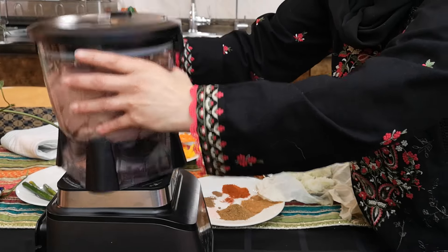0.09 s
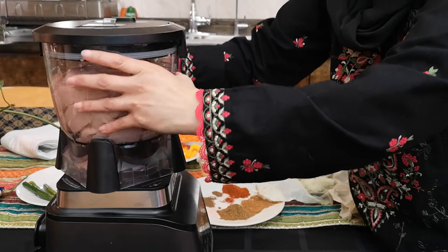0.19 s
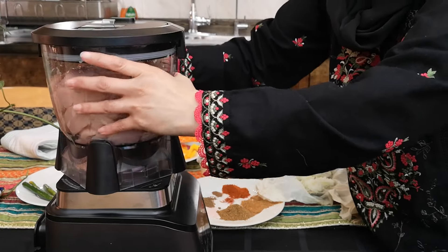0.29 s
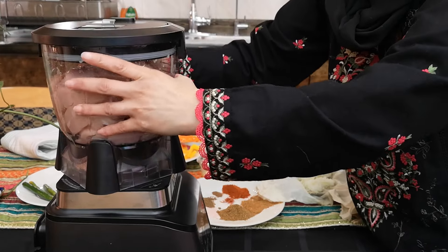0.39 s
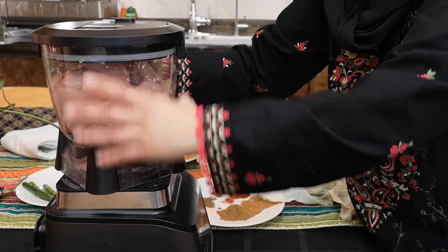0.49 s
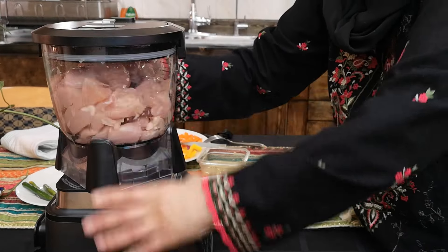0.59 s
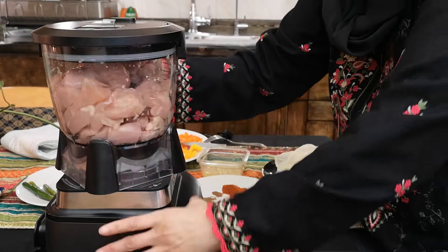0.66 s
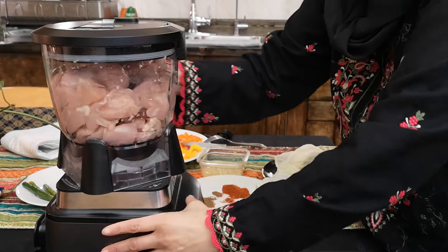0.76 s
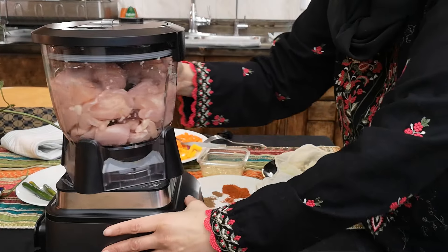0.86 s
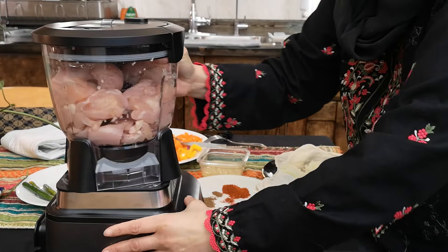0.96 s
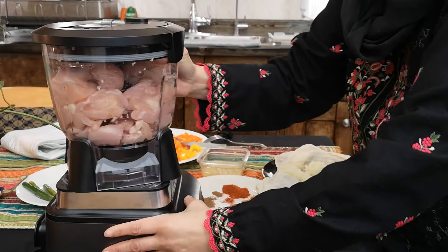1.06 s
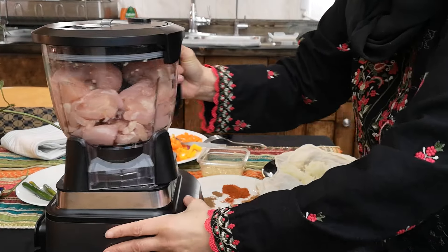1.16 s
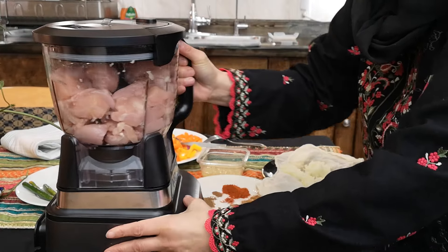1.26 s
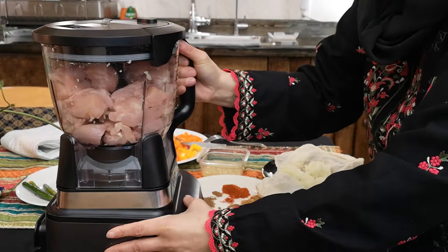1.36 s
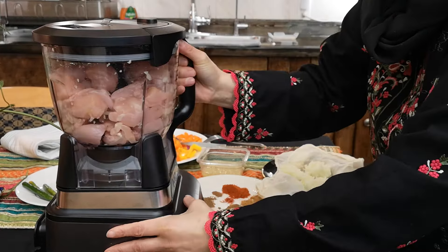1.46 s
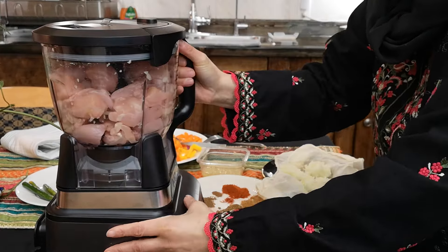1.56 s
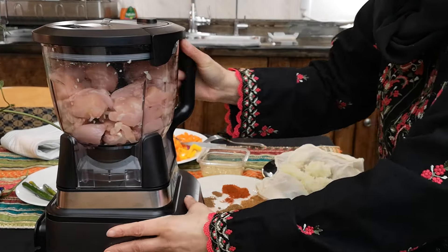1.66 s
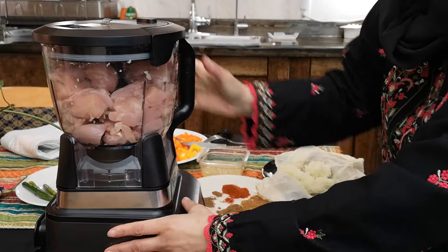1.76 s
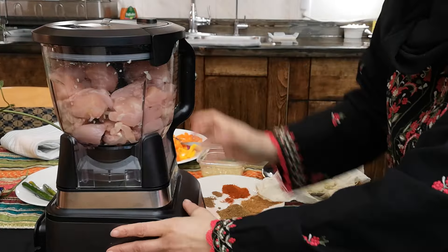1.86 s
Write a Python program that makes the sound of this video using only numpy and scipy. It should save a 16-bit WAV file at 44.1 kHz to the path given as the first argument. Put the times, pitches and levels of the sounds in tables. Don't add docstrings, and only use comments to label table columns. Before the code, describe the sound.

A loaded plastic food processor bowl touches its base at 0.16 seconds, landing with a heavy clunk at 0.24, rocking at 0.3 and rattling faintly near 0.41. A very faint thud comes at 0.85. Tabs scrape and click from 1.32, then a sharp snap locks at 1.40. A soft release knock follows at 1.78. Close stereo, short hard kitchen reverberation, quiet fan hiss, low drone, slight sleeve rustle.

```python
import sys
import numpy as np
from scipy import signal
from scipy.fft import rfft, irfft
from scipy.io import wavfile

SR = 44100
rng = np.random.default_rng(int(sys.argv[2]) if len(sys.argv) > 2 else 0)


def store_wav(level_fs):
    pcm = np.round(np.clip(np.atleast_2d(level_fs), -1, 1) * 32767)
    wavfile.write(sys.argv[1], SR, pcm.T.astype(np.int16))


def convert_level_to_amplitude(level_db):
    exponent = np.asarray(level_db, float) / 20
    return 10 ** exponent


N = 83790
TOP_HZ = 16450

# (f/Hz, level/dB, time to fade by 60 dB/s)
BOWL_MODES = [(142.6, -6.5, 0.11), (205.4, -2, 0.066), (289.7, 2.5, 0.044), (337, -1, 0.075),
              (688, -10.5, 0.035), (877, -18, 0.022), (1140, -33, 0.0098), (1390, -14.5, 0.048),
              (1530, -20, 0.036), (2460, -7.5, 0.0061)]
# (f/Hz, level per Hz/dB)
TAB_CRACK = [(180, -34), (300, 3), (2250, -10.5), (2650, 1.5), (3690, -21.5), (7370, -20.5), (15500, -40)]


def curve(rows):
    times, levels = np.transpose(rows)
    return np.interp(np.arange(N) / SR, times, levels)


def at_hz(points, hz):
    table = np.array(points)
    return np.interp(np.log(hz), np.log(table[:, 0]), table[:, 1])


def rms_one(x):
    return x / np.sqrt(np.mean(x ** 2) + 1e-20)


def high_pass(x, order, hz):
    return signal.sosfilt(signal.butter(order, hz, "high", fs=SR, output="sos"), x)


def since(start_s):
    return np.maximum(np.arange(N) / SR - start_s, 0)


def bands(low_hz, high_hz):
    count = int(6 * np.log2(high_hz / low_hz)) + 2
    edges = np.geomspace(low_hz, high_hz, count)
    return [(np.sqrt(a * b), signal.butter(2, [a, b], "band", fs=SR, output="sos"))
            for a, b in zip(edges, edges[1:])]


def spread(hz, mid, side):
    # (f/Hz, likeness from -1 to 1)
    likeness = [(100, 1), (200, 0.92), (350, 0.77), (600, -0.4), (2000, 0.13), (8000, -0.05), (13000, 0.2)]
    alike = np.clip(at_hz(likeness, hz), -.99, .99)
    return np.sqrt(1 + alike) * mid + np.sqrt(1 - alike) * side * [[1], [-1]]


def hiss(spectrum, patchy_db):
    warm_up = 8000
    out = 0
    white = rng.standard_normal((2, 2, N + warm_up))
    for k, (hz, sos) in enumerate(bands(spectrum[0][0], spectrum[-1][0])):
        mid, side = signal.sosfilt(sos, white[k % 2])[:, warm_up:]
        flicker = np.interp(np.arange(N), np.linspace(0, N, 24), rng.standard_normal(24))
        out = out + convert_level_to_amplitude(at_hz(spectrum, hz) + patchy_db * flicker) * spread(hz, mid, side)
    return rms_one(out)


def ring(x, hz, t60):
    r = convert_level_to_amplitude(-60 / (t60 * SR))
    w = 2 * np.pi * hz / SR
    return signal.lfilter([0, np.sin(w)], [1, -2 * r * np.cos(w), r * r], x + 1e-18)


def knocks(contacts, modes, crack, longest_s=.022):
    crack_s = 0.0027
    t = np.arange(900) / SR
    burst, out = np.zeros((3, N + SR)), np.zeros((3, N + SR))
    strengths_db = rng.normal(0, 1.3, (len(contacts), len(modes)))
    for s, crack_db, _, direct_db in contacts:
        i = int(s * SR)
        noise = rng.standard_normal((2, 900))
        burst[:2, i:i + 900] += convert_level_to_amplitude(crack_db + direct_db) * np.exp(-t / crack_s) * noise
        burst[2, i] += convert_level_to_amplitude(crack_db) * np.sqrt(crack_s * SR / 2)
    span = slice(int(contacts[0][0] * SR), int(contacts[-1][0] * SR) + SR // 2)

    filters = bands(max(crack[0][0], 300), TOP_HZ)
    power = sum(convert_level_to_amplitude(2 * at_hz(crack, hz)) * hz * .116 for hz, _ in filters) / (SR / 2)
    for k, (hz, sos) in enumerate(filters):
        gain = (-1) ** k * convert_level_to_amplitude(at_hz(crack, hz)) / np.sqrt(power) / 2
        out[:, span] += gain * signal.sosfilt(sos, burst[:, span] + 1e-18)

    for k, (hz, db, t60) in enumerate(modes):
        push = np.zeros((2, N + SR))
        for (s, _, body_db, direct_db), extra_db in zip(contacts, strengths_db[:, k]):
            push_db = body_db + db + extra_db - 5.5 + direct_db * np.array([1, 0])
            push[:, int(s * SR)] += convert_level_to_amplitude(push_db) * (-1) ** k
        fade_s = min(t60, longest_s) if hz > 1000 else t60
        near, far = ring(push[:, span], hz, fade_s)
        quarter_wave = int(SR / hz / 4)
        out[:, span] += [near, np.roll(near, quarter_wave) * (-1) ** k, far]
    return out[:, :N]


def rumble():
    # (f/Hz, level per Hz/dB)
    rumble_colour = [(11, -45), (18, -47), (33, 3.5), (53, -14.5), (69, -16), (92, 0), (136, -11.5),
                     (293, -19.5), (480, -24.5), (620, -56), (1060, -120)]
    return convert_level_to_amplitude(-47) * hiss(rumble_colour, patchy_db=3.5)


def fan():
    # (f/Hz, level per Hz/dB)
    fan_colour = [(280, -76), (480, -24), (548, -5.5), (644, -7), (943, -6.5), (1750, -1), (4030, -24),
                  (5650, -19.5), (16000, -34)]
    return convert_level_to_amplitude(-53) * hiss(fan_colour, patchy_db=1.9)


def drone():
    # (t/s, level/dB)
    drone_level = [(0, -76), (.12, -43.5), (.5, -49), (.85, -45.5), (.98, -60), (1.9, -53.5)]
    drone_hz, width_hz = 84, 11.5
    note = ring(rng.standard_normal(N + SR), drone_hz, 1.9 / width_hz)
    return convert_level_to_amplitude(curve(drone_level)) * rms_one(note[SR:])


def sleeve():
    # (t/s, level/dB)
    rustle_level = [(0, -77), (.7, -62.5), (.88, -62.5), (1.0, -61.5), (1.2, -70.5), (1.3, -57.5)]
    return convert_level_to_amplitude(curve(rustle_level)) * hiss([(2500, 10), (6000, -5), (11000, -9.5)], patchy_db=3)


def seat():
    # (t/s, crack level/dB, body level/dB, straight path level/dB)
    seat_hits = [
        (.1615, -26, -27, -6.5),
        (.174, -45, -61, -6),
        (.1862, -30, -40, 4),
        (.1987, -8.5, -13, -8),
        (.2092, -13, -13.5, -12),
        (.217, -25, -9.5, -6.5),
        (.300, -14.5, -13.5, -0.5),
        (.392, -32, -21.5, -5),
    ]
    # (f/Hz, level per Hz/dB)
    seat_crack = [(240, -13), (400, 8), (633, 3.5), (957, -0.5), (1490, -4.5), (2320, -4.5), (2550, -16),
                  (10300, -26), (15500, -52)]
    return knocks(seat_hits, BOWL_MODES, seat_crack)


def counter():
    # (t/s, level/dB, f/Hz, rise/s, time to fade by 60 dB/s, phase/rad)
    sways = [
        (0.263, -5.5, 22, 0.062, 1.1, 1.28),
        (1.455, -12.5, 30, 0.03, 0.35, 3.3),
        (.243, -19, 58, 0.013, 0.39, 0.28),
        (.27, -26.5, 80, 0.017, 0.73, 0.37),
        (.2, -22.5, 48, 0.013, 0.39, .3),
    ]
    out = np.zeros(N)
    for s, db, hz, rise, t60, phase in sways:
        t = since(s)
        swell = 1 - np.exp(-(t / rise) ** 2)
        out += convert_level_to_amplitude(db - 60 * t / t60) * swell * np.sin(2 * np.pi * hz * t + phase)
    return out


def rings():
    # (t/s, level/dB, time to fade by 60 dB/s)
    thin_rings = [(.2, -28.5, 0.12), (.33, -42.5, 1.05), (1.32, -36.5, 0.16), (1.364, -24.5, 0.084),
                  (1.376, -19, 0.094), (1.46, -33.5, 0.97), (1.455, -40, 0.39), (1.437, -26, 0.38),
                  (.85, -26.5, 0.17), (2.2, -26, .15), (.2405, -9, 0.11), (.2405, -13, 0.15),
                  (.212, -18.5, 0.17), (.303, -16, 0.11), (1.345, -30, 0.26)]
    ring_pitches = [670, 655, 670, 770, 272, 1020, 790, 315, 285, 705, 295, 190, 285, 320, 325]
    out = np.zeros(N)
    for (s, db, t60), hz in zip(thin_rings, ring_pitches):
        t = since(s)
        swell = 1 - np.exp(-t / 0.0028)
        out += convert_level_to_amplitude(db - 60 * t / t60) * swell * np.sin(2 * np.pi * hz * t)
    return out


def land():
    # (t/s, crack level/dB, body level/dB, straight path level/dB)
    land_hits = [
        (.2408, -3.5, -5, -1.5),
        (.2445, -16.5, -10.5, 2.8),
        (.252, -21, -10.5, 3.5),
    ]
    # (f/Hz, level per Hz/dB)
    land_crack = [(240, -21), (400, -4.5), (957, -2), (1490, -2), (2550, -6.5), (3600, -14), (5500, -17),
                  (9300, -21), (11000, -32), (15500, -40)]
    return knocks(land_hits, BOWL_MODES, land_crack)


def rattle():
    # (t/s, crack level/dB, body level/dB, straight path level/dB)
    rattle_hits = [
        (.412, -32, -26.5, -8.5),
        (.421, -50, -40, 7),
        (.437, -43, -38.5, -4),
        (.452, -47, -43.5, -9),
        (.855, -70, -63, 2),
    ]
    # (f/Hz, level/dB, time to fade by 60 dB/s)
    stem_modes = [(2385, 3, 0.04), (3490, -1.5, 0.045), (3850, 0.5, .03), (4206, 7, 0.022),
                  (7390, 0.5, 0.048), (7840, 1.5, 0.042), (8355, -9, 0.024), (10470, -10, 0.03),
                  (11150, -14, .03), (12000, -14, 0.03)]
    # (f/Hz, level per Hz/dB)
    rattle_crack = [(590, -39), (1000, -14), (3180, 9), (4290, 2), (6630, 4), (7610, 6), (15500, -11)]
    return knocks(rattle_hits, stem_modes, rattle_crack, longest_s=.033)


def settle():
    # (t/s, crack level/dB, body level/dB, straight path level/dB)
    settle_hits = [
        (.85, -29.5, -18, 2.5),
        (.912, -41, -46, -3),
        (1.45, -63, -19.5, -2),
        (1.48, -28, -29, -4),
    ]
    # (f/Hz, level/dB, time to fade by 60 dB/s)
    base_modes = [(298, 2, 0.064), (195.5, -15.5, 0.22), (786, -13.5, 0.06)]
    return knocks(settle_hits, base_modes, TAB_CRACK)


def twist():
    # (t/s, crack level/dB, body level/dB, straight path level/dB)
    twist_hits = [
        (1.3175, -19.5, -22.5, -11),
        (1.325, -40, -25, -11),
        (1.332, -30, -27.5, -4),
        (1.35, -33, -27, -4),
    ]
    # (f/Hz, level/dB, time to fade by 60 dB/s)
    tab_modes = [(322, -3, 0.14), (695, -8.5, 0.095), (1450, 9, 0.0048), (2800, -16, 0.02),
                 (7400, -2, 0.0076), (9460, -13.5, 0.016)]
    return knocks(twist_hits, tab_modes, TAB_CRACK)


def catch():
    # (t/s, crack level/dB, body level/dB, straight path level/dB)
    catch_hits = [
        (1.365, -13.5, -18, -7.5),
        (1.378, -27, -21, -6),
        (1.383, -28, -27, -1.5),
    ]
    # (f/Hz, level/dB, time to fade by 60 dB/s)
    ramp_modes = [(255, 6, 0.02), (584, -7, 0.052), (750, 1, 0.017), (1650, -3.5, 0.0074),
                  (2140, -8.5, 0.049), (2540, 1.5, 0.014), (5300, -14, 0.012), (7150, -26, 0.009)]
    # (f/Hz, level per Hz/dB)
    catch_crack = [(180, -29), (300, 9.5), (461, -21), (2400, -3), (4280, -23.5), (10100, -22.5),
                   (15500, -60)]
    return knocks(catch_hits, ramp_modes, catch_crack)


def snap():
    # (t/s, crack level/dB, body level/dB, straight path level/dB)
    snap_hits = [
        (1.4033, -5, -11.5, -5),
        (1.413, -26, -35, -4),
        (1.42, -37, -30.5, 13),
        (1.432, -28, -25.5, 10.5),
    ]
    # (f/Hz, level/dB, time to fade by 60 dB/s)
    latch_modes = [(2260, 3.5, 0.014), (2676, 4.5, .04), (2864, 0, 0.09), (4890, -2, 0.0098),
                   (5410, -3, 0.017), (8830, -4, 0.025), (10100, -36, 0.026)]
    # (f/Hz, level per Hz/dB)
    snap_crack = [(400, -23.5), (1100, -5), (3100, -10), (4050, -16.5), (4700, -6), (6300, -8), (9800, -10),
                  (11500, -24), (15500, -30.5)]
    return knocks(snap_hits, latch_modes, snap_crack)


def release():
    # (t/s, crack level/dB, body level/dB, straight path level/dB)
    release_hits = [
        (1.780, -14.5, -16.5, -7),
        (1.789, -36, -12.5, -6.5),
    ]
    # (f/Hz, level/dB, time to fade by 60 dB/s)
    handle_modes = [(722, -5.5, 0.078), (1800, -2, 0.015), (3870, -7, 0.011), (7330, 0.5, 0.0075)]
    # (f/Hz, level per Hz/dB)
    release_crack = [(500, -2), (1500, 1), (2600, 1), (3300, -16), (5500, -1), (7500, -2), (10000, -15.5),
                     (15500, -38)]
    return knocks(release_hits, handle_modes, release_crack)


def kitchen(x):
    # (f/Hz, time to fade by 60 dB/s)
    room_fade = [(100, 0.8), (300, 0.36), (1000, 0.48), (3000, 0.5), (6000, 0.49), (14000, 0.32)]
    gap_s, rise_s, low_db = 0.0064, 0.00058, -4.5
    t = np.arange(SR) / SR
    tail = 0
    white = rng.standard_normal((2, 2, SR))
    for k, (hz, sos) in enumerate(bands(69.6, TOP_HZ)):
        mid, side = signal.sosfilt(sos, white[k % 2]) * convert_level_to_amplitude(-60 * t / at_hz(room_fade, hz))
        tail = tail + spread(hz, mid, side) * convert_level_to_amplitude(low_db * (hz < 900))
    tail = tail * (1 - np.exp(-np.maximum(t - gap_s, 0) / rise_s))
    tail = tail / np.sqrt(np.sum(tail ** 2) / 2)
    return convert_level_to_amplitude(4.5) * signal.fftconvolve(x[None], tail, axes=1)[:, :N]


def straight_path(mid, other):
    side = high_pass(other, 4, 450)
    direct = mid + side * [[1], [-1]]
    bright_db = 3.5 + 8 * np.array([[.5], [-.5]])
    return direct + (convert_level_to_amplitude(bright_db) - 1) * high_pass(direct, 2, 4000)


def scene():
    # (t/s, level/dB)
    duck = [(0, 0.5), (.47, -4), (.52, -15), (.8, -18.5), (1.3, 3.5), (1.391, 1.5), (1.399, -6),
            (1.4025, -3), (1.53, -3), (1.58, -12), (1.9, -22.5)]
    contacts = seat() + land() + rattle() + twist() + catch() + snap() + settle() + release()
    mid, other, feed = high_pass(contacts, 2, 93)
    action = straight_path(mid, other) + kitchen(feed) + rings() + counter()
    background = rumble() + fan() + drone() + sleeve()
    duck_db = curve(duck)
    return action * convert_level_to_amplitude(duck_db) + background * convert_level_to_amplitude(0.069 * duck_db)


def mics(x):
    # (f/Hz, left minus right level/dB)
    balance = [(200, 0), (400, -0.7), (700, 2), (1290, -0.7), (2380, -2), (4400, 0), (8120, 1.4),
               (15000, -5.5)]
    hz = np.maximum(np.arange(N // 2 + 1) * SR / N, 1)
    half_db = at_hz(balance, hz) * np.array([[.5], [-.5]])
    return irfft(rfft(x) * convert_level_to_amplitude(half_db), N)


def band_limit(x):
    return signal.sosfilt(signal.butter(12, 16460, fs=SR, output="sos"), x)


def record(dry):
    rounded = 1.738 * np.tanh(mics(dry) / 1.439) - .002
    top_cut = signal.cheby2(12, 70, TOP_HZ + 250, fs=SR, output="sos")
    mix = signal.sosfilt(top_cut, rounded)
    return band_limit(mix)


dry = scene()
out = record(dry)
store_wav(out)
```